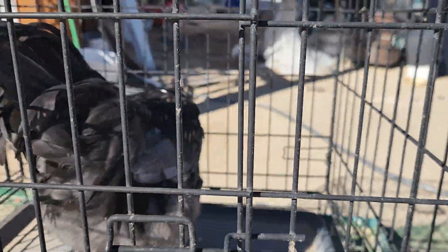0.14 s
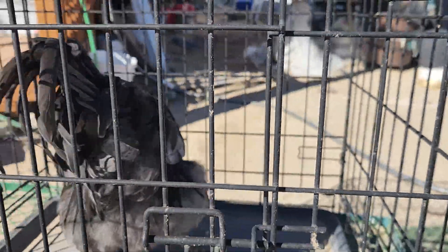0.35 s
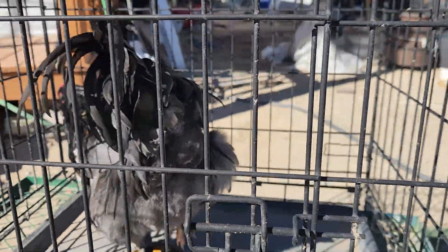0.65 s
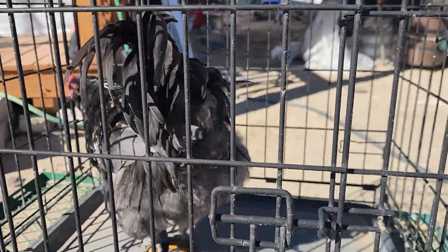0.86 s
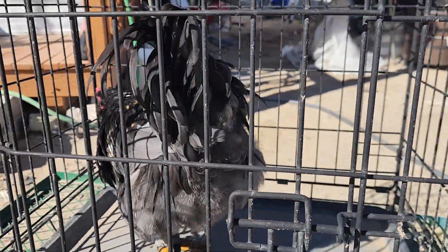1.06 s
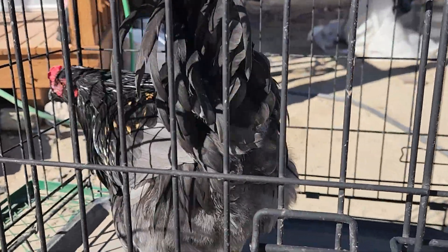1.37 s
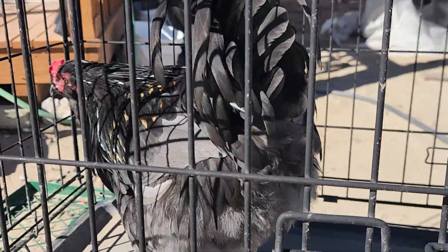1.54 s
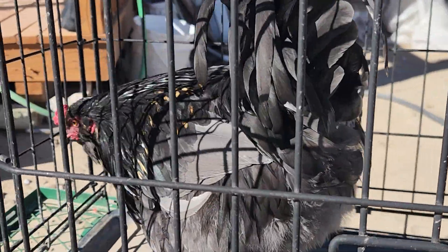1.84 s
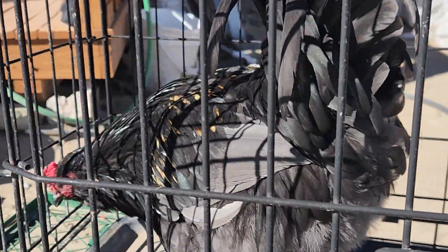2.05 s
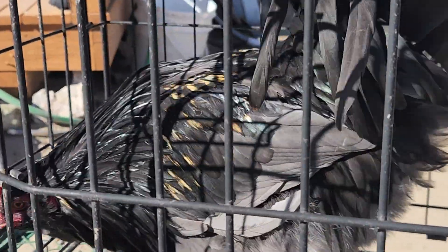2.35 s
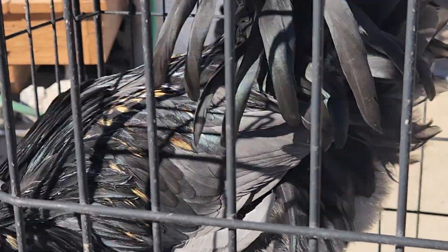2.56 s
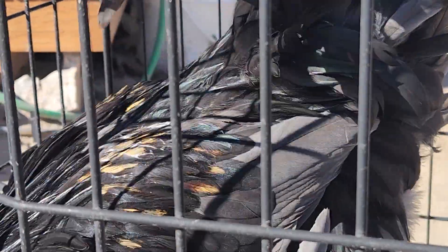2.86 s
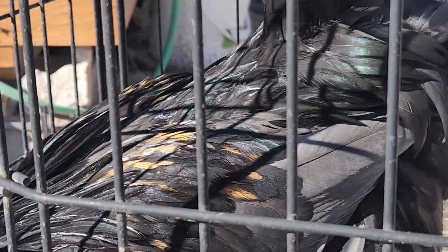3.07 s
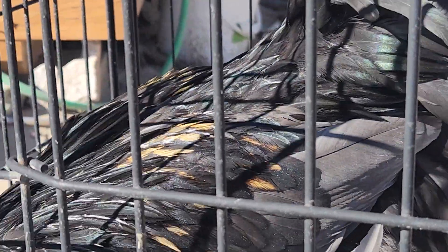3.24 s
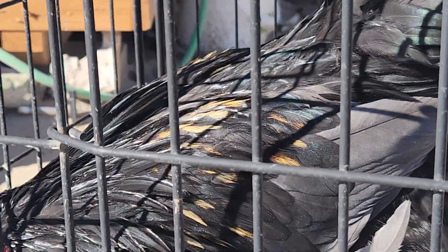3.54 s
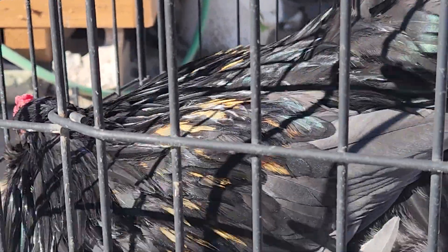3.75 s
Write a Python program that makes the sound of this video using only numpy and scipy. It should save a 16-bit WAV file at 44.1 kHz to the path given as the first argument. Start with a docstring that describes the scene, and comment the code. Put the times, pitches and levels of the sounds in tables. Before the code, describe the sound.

One short, raspy rooster squawk among light knocks and rustles in a cage outdoors.

```python
"""A quiet yard hisses faintly and light wind rumbles on the microphone. Close by, a rooster's feet
knock on the tray of its wire cage and its feathers brush the bars; other fowl call far off.
At 1.3 s it squawks once: one side of its syrinx rattles in a rasp, the other breaks into a shrill
whistle, and the call sinks to a hoarse groan. From 2.2 s come more knocks and brushes, then soft
bumps of a hand on the microphone among the last gusts."""
import sys
import numpy as np
from scipy import signal
from scipy.fft import rfft, irfft
from scipy.io import wavfile
from scipy.ndimage import uniform_filter1d

SR = 44100
rng = np.random.default_rng(int(sys.argv[2]) if len(sys.argv) > 2 else 0)


def transcribe(u):
    """Save the signal u as a 16-bit wav file named by the first command-line argument.

    u: samples, shape (n,) or (channels, n), limited to [-1, 1]; the rate is SR.
    q: integer samples, one column per channel.
    """
    v = np.clip(np.atleast_2d(u).T, -1, 1)
    q = np.round(v * 32767).astype(np.int16)
    wavfile.write(sys.argv[1], SR, q)


N = 171990
T = np.arange(N) / SR


def undb(db):
    """Decibels to gain."""
    return 10 ** (np.asarray(db) / 20)


def unit(x):
    """Scale to rms 1."""
    return x / np.sqrt(np.mean(x ** 2))


def curves(table):
    """Each column after the first as an automation curve over time."""
    rows = np.array(table, float).T
    return [np.interp(T, rows[0], col) for col in rows[1:]]


def gate(table):
    """Open from the first row's time to the last, with soft edges."""
    return uniform_filter1d(1. * ((T >= table[0][0]) & (T <= table[-1][0])), size=128)


def response(points, hz):
    """Gain of an EQ curve at the given frequencies."""
    f, db = np.array(points, float).T
    return undb(np.interp(np.log(hz + 1), np.log(f), db))


def colour(x, points):
    """Minimum-phase EQ that keeps the power of white noise."""
    gain = unit(response(points, np.linspace(0, SR / 2, 4097)))
    cepstrum = irfft(np.log(gain))
    cepstrum[1:4096] *= 2
    cepstrum[4097:] = 0
    return signal.fftconvolve(x, irfft(np.exp(rfft(cepstrum))))[:N]


def noise():
    """White noise."""
    return rng.standard_normal(N)


def walk(rate):
    """Smooth random motion of rms 1."""
    hold = max(int(SR / rate), 1)
    steps = np.repeat(noise()[:N // hold + 1], hold)
    return unit(uniform_filter1d(steps, hold)[:N])


def stereo_noise(points, spread):
    """Coloured noise, partly different left and right."""
    mid, side = colour(noise(), points), colour(noise(), points)
    return np.array([mid + spread * side, mid - spread * side]) / np.hypot(1, spread)


def pan(db):
    """Constant-power gains; positive dB leans left."""
    return unit(undb(np.array([[db], [-db]]) / 2))


def hit(start, decay):
    """Instant attack and exponential fall."""
    out, i = np.zeros(N), int(start * SR)
    age = T[:min(N - i, SR // 4)]
    out[i:i + len(age)] = np.exp(-age / decay)
    return out


def echo(x, t60, dull_hz):
    """Scattered reflections, different at each ear."""
    age = T[:SR // 2]
    tail = rng.standard_normal((2, len(age))) * np.exp(-np.log(1000) * age / t60) * (age > .002)
    tail /= np.sqrt((tail ** 2).sum(1, keepdims=True))
    tail = signal.sosfilt(signal.butter(1, dull_hz, fs=SR, output="sos"), tail)
    return signal.fftconvolve(x, tail, axes=1)[:, :N]


# The yard's ambience. Each row: frequency in Hz, relative gain in dB.
YARD_EQ = [(100, 13), (300, 4), (600, -4), (1100, -4), (2000, -14.5), (3500, -17), (5500, -17.5),
           (7600, -17), (9000, -49.5), (12500, -30.5), (16000, -29.5)]
# Its fader. Each row: time in seconds, level in dB.
YARD_FADER = [(0, -52.5), (.5, -50.5), (1.1, -62.5), (2.9, -56), (3.9, -56)]
def yard():
    """A wide, distant wash whose level wavers slightly."""
    return stereo_noise(YARD_EQ, spread=.78) * undb(curves(YARD_FADER)[0] + .41 * walk(11))


# Gusts. Each row: time in seconds, level in dB.
GUSTS = [(.6, -41), (1.08, -42), (1.23, -33), (1.3, -42), (1.73, -31), (1.82, -40.5), (2.38, -36.5),
         (2.6, -31.5), (2.74, -38.5), (3.1, -34), (3.42, -25.5), (3.49, -41.5), (3.65, -39.5),
         (3.73, -27.5), (3.8, -36.5)]
# Their low rumble. Each row: frequency in Hz, relative gain in dB.
WIND_EQ = [(15, -12.5), (45, 3), (90, 0.5), (130, -12.5), (280, -38.5), (1000, -87.5)]
def wind():
    """Gusts buffet the microphone's ports."""
    return pan(1.3) * stereo_noise(WIND_EQ, spread=.28) * undb(curves(GUSTS)[0])


# Footfalls. Each row: start in seconds, relative levels of thud, clack and tick in dB,
# tick decay in seconds, pan in dB.
STEPS = [(.203, -27.5, -43, -45.5, 0.015, 2), (.228, -34.5, -46, -35.5, 0.0039, 2),
         (.236, -27, -49, -38, 0.0009, 4), (.774, -79, -40.5, -38.5, 0.0033, 40),
         (1.224, -38, -66, -47.5, 0.0038, -2.5), (2.223, -43.5, -75, -40, 0.007, -3),
         (2.277, -45, -54, -53, 0.0057, -15), (2.42, -30.5, -41.5, -40.5, 0.0035, -4),
         (2.44, -34, -44.5, -48, 0.0036, 12), (2.476, -22, -45, -28, 0.0051, 1),
         (2.483, -22, -35.5, -35, 0.0019, 0.5), (2.507, -45, -36.5, -36.5, 0.012, 3),
         (2.606, -35, -44.5, -39.5, 0.0044, 1), (2.833, -45, -30.5, -22.5, 0.0052, 1.5),
         (2.852, -23, -30.5, -24.5, 0.003, -1), (3.835, -39, -43.5, -48.5, 0.028, 0)]
# The tray's modes. Each row: frequency in Hz, relative level in dB, T60 in seconds.
TRAY_MODES = [(255.7, -6.5, 0.32), (295.3, 5.5, 0.071), (342, 3.5, 0.12), (380, -22.5, 0.092),
              (580, -13, 0.11)]
# Tone of the clack and of the claw's tick. Each row: frequency in Hz, relative gain in dB.
CLACK_EQ = [(200, 16), (450, -0.5), (1000, 9.5), (2400, -7), (9000, -35.5)]
CLAW_EQ = [(600, -22), (2400, 4), (4200, -1), (6500, -4), (9800, -23.5), (13000, -20.5), (16000, -30)]
def foot_knocks():
    """Each step rings the tray's modes, with a short clack and the tick of a claw."""
    pushes, clacks, ticks = np.zeros((3, 2, N))
    grit = noise()
    scrape = stereo_noise([(100, .011), (16000, .006)], spread=1)  # all but white
    for start, thud_db, clack_db, tick_db, tick_decay, pan_db in STEPS:
        burst = hit(start, decay=.0088) * grit + 7 * hit(start, decay=1 / SR)
        pushes += pan(pan_db) * undb(thud_db) * hit(start, decay=.0013)
        clacks += pan(pan_db) * undb(clack_db) * burst
        ticks += pan(pan_db) * undb(tick_db) * hit(start, tick_decay) * scrape
    age = T[:SR // 2]
    tray = 0
    for hz, db, t60 in TRAY_MODES:
        mode = np.cos(2 * np.pi * hz * age) * np.exp(-np.log(1000) * age / t60)
        tray += undb(db) * mode * 2 * np.pi * hz / SR
    channels = []
    for push, clack, tick in zip(pushes, clacks, ticks):
        thud = undb(-8.5) * signal.fftconvolve(push, tray)[:N]
        channels.append(thud + colour(clack, CLACK_EQ) + wires(clack) + colour(tick, CLAW_EQ))
    return np.array(channels)


# The bars' modes. Each row: frequency in Hz, relative level in dB.
WIRE_MODES = [(1040, -6), (2320, -4.5), (3260, -8)]
def wires(clack, t60=.023):
    """The bars ring briefly with each clack."""
    age = T[:SR // 10]
    ring = sum(undb(db) * np.sin(2 * np.pi * hz * age) for hz, db in WIRE_MODES)
    ring *= np.exp(-np.log(1000) * age / t60)
    return undb(-22) * signal.fftconvolve(clack, ring)[:N]


# Dry tocks. Each row: start in seconds, level before the EQ in dB.
TOCK_CUES = [(.302, -25.5), (0.508, -28.5), (.673, -18.5), (2.41, -28)]
# Their dull tone. Each row: frequency in Hz, relative gain in dB.
TOCK_EQ = [(150, 0.5), (450, 13.5), (1600, 5), (2200, -22.5)]
def tocks():
    """Single snaps on the tray that die at once."""
    clicks = sum(undb(db) * hit(start, decay=1 / SR) for start, db in TOCK_CUES)
    return colour(clicks, TOCK_EQ)


# Brushes on the bars. Each row: peak time, rise and fall in seconds, level in dB, top-octave gain in dB.
BRUSH_CUES = [(0.566, 0.024, 0.065, -45, -13), (0.629, 0.028, 0.098, -46.5, -5),
              (0.899, 0.013, 0.013, -53.5, -10), (0.994, 0.05, 0.029, -58.5, -6),
              (2.24, 0.024, 0.061, -50.5, -2), (2.281, 0.0038, 0.0052, -33, -1.5),
              (2.512, 0.039, 0.011, -45.5, 1.5), (2.608, 0.029, 0.054, -49, -10),
              (2.683, 0.016, 0.026, -38, 11), (2.848, 0.022, 0.082, -54, 11.5)]
# Their rustle. Each row: frequency in Hz, relative gain in dB.
FEATHER_EQ = [(300, -1.5), (700, -5), (1200, -2), (1800, -3), (2600, 1.5), (4200, 1), (6000, -5.5),
              (7800, -7.5), (9600, -29), (12500, -16), (16000, -26)]
def feathers(grain_db=4.5):
    """Barbs scrape over wire in grainy swells."""
    barbs = stereo_noise(FEATHER_EQ, spread=.76) * unit(undb(grain_db * walk(500)))
    top = signal.sosfiltfilt(signal.butter(3, 8500, "high", fs=SR, output="sos"), barbs)
    out = 0
    for peak, rise, fall, db, top_db in BRUSH_CUES:
        from_peak = abs(T - peak) / np.where(T < peak, rise, fall)
        swell = np.exp(-np.minimum(from_peak, 10) ** 3.3)
        out += undb(db) * swell * (barbs + (undb(top_db) - 1) * top)
    return pan(.32) * out


# Background calls. Each row: start and length in seconds, starting pitch in Hz, level in dB.
FOWL_CUES = [(0.733, 0.16, 1023, -59.5), (2.103, 0.43, 1112, -63), (3.426, 0.4, 1110, -64.5)]
def far_fowl(sag_per_s=.25, waver=.05):
    """Other fowl far off: faint, wavering calls that sag in pitch."""
    out = 0
    for start, length, hz, db in FOWL_CUES:
        age = np.clip(T - start, 0, length)
        pitch = hz * (1 - sag_per_s * age + waver * walk(200))
        phase = 2 * np.pi * np.cumsum(pitch) / SR
        tone = np.sin(phase) + undb(-25.5) * np.sin(2 * phase)
        out += undb(db) * np.sin(np.pi * age / length) * tone
    return out


# The rattling side of the syrinx. Each row: time in seconds, pulses per second, level in dB,
# roughness (drives jitter and breath), treble gain in dB.
RASP_MOVES = [(1.316, 112, -38.5, .044, 10.5), (1.326, 130, -23.5, 0.036, -9.5),
              (1.352, 257, -19.5, .035, -3), (1.402, 270, -25.5, 0.05, 4), (1.428, 224, -36.5, 0.03, 10.5),
              (1.612, 220, -47, 0.062, 7.5), (1.645, 378, -45.5, .03, 15), (1.705, 430, -33.5, 0.028, 0.5),
              (1.8, 380, -51.5, 0.058, -6)]
# The rasp's resonances. Each row: frequency in Hz, relative gain in dB.
RASP_EQ = [(200, -45.5), (420, -21), (560, -32), (800, -15), (1000, -10.5), (1400, 5.5), (1690, -8),
           (1900, -14.5), (2650, -18.5), (4200, -14), (6300, -33), (9000, -67), (15000, -71.5)]
def rasp():
    """Uneven pulses, each with a puff of breath, ring the throat; also gives their phase in cycles."""
    hz, db, roughness, treble_db = curves(RASP_MOVES)
    breath = 19 * roughness
    rate = hz * (1 + 2 * roughness * walk(250)) * (T >= RASP_MOVES[0][0])
    cycles = np.cumsum(rate) / SR + .61
    sharpness = .8 * SR / hz
    pulses = np.sinc((cycles % 1 - .5) * sharpness) * np.sqrt(sharpness)
    puffs = 2 * np.exp(-((cycles + .5) % 1) / .5) * noise()
    airflow = pulses * np.sqrt(np.clip(1 - breath ** 2, 0, 1)) + breath * puffs
    voice = colour(airflow, RASP_EQ)
    treble = signal.sosfiltfilt(signal.butter(2, 2500, "high", fs=SR, output="sos"), voice)
    return (voice + (undb(treble_db) - 1) * treble) * undb(db) * gate(RASP_MOVES), cycles


# The shrill side of the syrinx. Each row: time in seconds, pitch in Hz, fundamental level in dB,
# overtone level before the throat in dB.
WHISTLE_MOVES = [(1.368, 1035, -66, -43.5), (1.378, 1046, -49, -21), (1.402, 1037, -19, -25.5),
                 (1.424, 1059, -22.5, -29.5), (1.445, 1040, -34.5, -31), (1.483, 1064, -25, -29),
                 (1.502, 1027, -34.5, -24), (1.53, 1034, -22, -22.5), (1.562, 1017, -20, -25.5),
                 (1.598, 1021, -21, -35.5), (1.629, 996.5, -41, -48), (1.635, 1154, -30.5, -35.5),
                 (1.66, 1144, -27.5, -37), (1.715, 1137, -34, -46), (1.79, 1049, -65, -69)]
# The throat's shaping of the overtones. Each row: frequency in Hz, gain in dB.
THROAT_EQ = [(2200, -6), (2700, 19.5), (3070, -9), (3420, -17.5), (4100, -14), (4550, -7), (5120, -19.5),
             (7200, -32), (9300, -53), (15000, -58.5)]
def whistle(rasp_cycles, jitter=.0045, flutter_db=3, pull_radians=.04):
    """A high harmonic tone, shaken by the rattle beside it."""
    hz, fundamental_db, overtone_db = curves(WHISTLE_MOVES)
    phase = 2 * np.pi * np.cumsum(hz * (1 + jitter * walk(300))) / SR
    phase += pull_radians * np.sin(2 * np.pi * rasp_cycles)
    overtones = 0
    for k in range(2, 15):
        flutter = undb(flutter_db * walk(60.45))
        overtones += response(THROAT_EQ, k * hz) * flutter * np.sin(k * phase)
    tone = undb(fundamental_db) * np.sin(phase) + undb(overtone_db) * overtones
    return np.sqrt(2) * (tone + undertones(hz / 5, phase / 5)) * gate(WHISTLE_MOVES)


# The undertones' fader. Each row: time in seconds, level before the EQ in dB.
UNDERTONE_FADER = [(1.39, -49.5), (1.448, -25.5), (1.51, -40.5), (1.62, -60)]
# Their resonances. Each row: frequency in Hz, gain in dB.
UNDERTONE_EQ = [(850, -39.5), (1450, 3), (1700, -1), (2100, -38.5), (4800, -18.5), (9000, -51)]
def undertones(hz, phase):
    """Partials between the whistle's harmonics, as the slow side locks to every fifth cycle."""
    partials = 0
    for k in range(2, 35):
        if k % 5:
            gain = response(UNDERTONE_EQ, k * hz) * undb(2 * walk(50))
            partials += gain * np.sin(k * phase + 2 * np.pi * rng.random() + walk(50) / 2)
    return partials * undb(curves(UNDERTONE_FADER)[0]) * gate(UNDERTONE_FADER)


# The closing groan. Each row: time in seconds, pitch in Hz, fundamental level in dB.
GROAN_MOVES = [(1.565, 728, -69.5), (1.585, 724, -52.5), (1.61, 722, -44), (1.64, 760, -69),
               (1.69, 805.5, -36.5), (1.722, 759, -35), (1.81, 691, -75)]
# Its second harmonic. Each row: time in seconds, level against the fundamental in dB.
OCTAVE_FADER = [(1.62, 13), (1.72, -11)]
def groan(jitter=.0159):
    """A lower, unsteady tone as the effort runs out."""
    hz, db = curves(GROAN_MOVES)
    phase = 2 * np.pi * np.cumsum(hz * (1 + jitter * walk(300))) / SR
    octave = undb(curves(OCTAVE_FADER)[0]) * np.sin(2 * phase)
    tone = np.sin(phase) + octave + undb(-8) * np.sin(3 * phase)
    return np.sqrt(2) * tone * undb(db) * gate(GROAN_MOVES)


NEAR_T60_S, YARD_T60_S = .06, .65
# The squawk's stereo image. Each row: frequency in Hz, left minus right in dB.
SQUAWK_PAN = [(400, -1.5), (1000, 1.5), (1600, -5), (2100, 3.5), (3000, -3.5), (4200, -14.5), (5200, -6),
              (6500, -12.5), (12000, 17)]
def squawk(left_lag_s=.00039):
    """The three voices reach the right side first; the tray and ground reflect them."""
    rattle, cycles = rasp()
    spectrum = rfft(rattle + whistle(cycles) + groan())
    hz = np.fft.rfftfreq(N, 1 / SR)
    balance = response(SQUAWK_PAN, hz)
    right = spectrum * np.sqrt(2 / (1 + balance ** 2))
    left = right * balance * np.exp(-2j * np.pi * hz * left_lag_s)
    direct = irfft(np.array([left, right]), N)
    near = undb(-17) * echo(direct, NEAR_T60_S, dull_hz=8540)
    return direct + near + undb(-32) * echo(direct, YARD_T60_S, dull_hz=3000)


# Handling bumps. Each row: peak time and half-width in seconds, level in dB.
BUMP_CUES = [(2.901, 0.24, -44), (3.288, 0.02, -35), (3.40, 0.046, -37.5), (3.737, 0.029, -35)]
# Their muffled tone. Each row: frequency in Hz, relative gain in dB.
BUMP_EQ = [(60, -12.5), (120, 14), (250, -0.5), (360, -10.5), (550, -32.5), (1500, -71)]
def hand_bumps():
    """A hand nudges the microphone in soft, low swells."""
    swells = sum(undb(db) * np.exp(-((T - peak) / width) ** 2) for peak, width, db in BUMP_CUES)
    return pan(1.3) * stereo_noise(BUMP_EQ, spread=.59) * swells


def scene():
    """The mix: yard and wind under the cage sounds, the far fowl, the squawk and the bumps."""
    contact = foot_knocks() + feathers()
    effects = contact + echo(contact, NEAR_T60_S, dull_hz=5000) / 2 + tocks() + far_fowl()
    reverb = undb(-9.5) * echo(effects, YARD_T60_S, dull_hz=2380)
    return yard() + wind() + effects + reverb + squawk() + hand_bumps()


def record(dry, top_hz=16000):
    """A steep low-pass cuts the very top."""
    return signal.sosfilt(signal.ellip(8, .2, 70, top_hz, fs=SR, output="sos"), dry)


dry = scene()
out = record(dry)
transcribe(out)
```